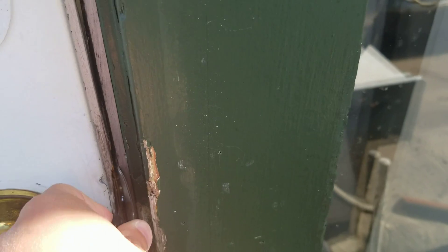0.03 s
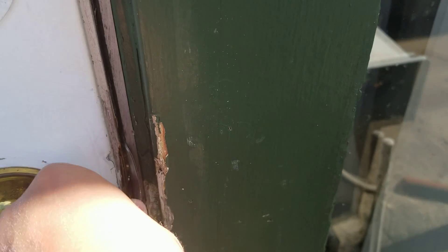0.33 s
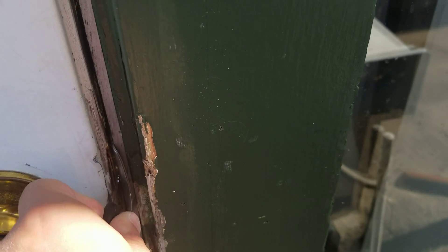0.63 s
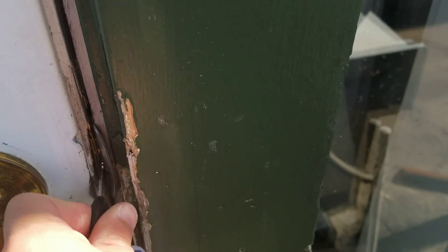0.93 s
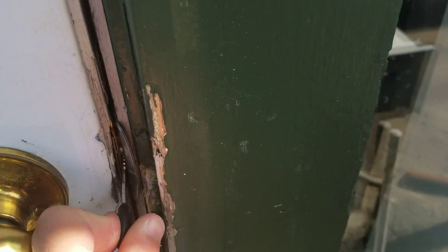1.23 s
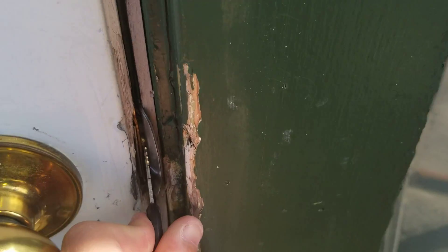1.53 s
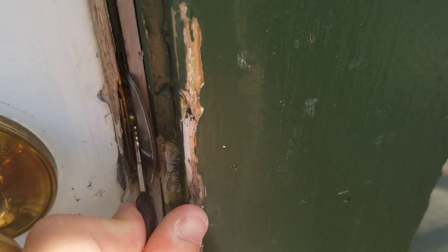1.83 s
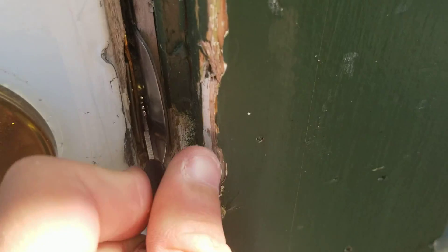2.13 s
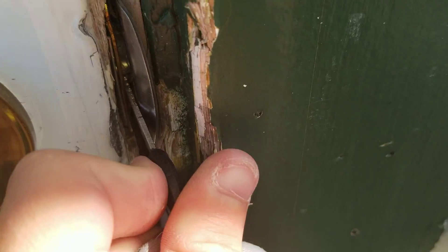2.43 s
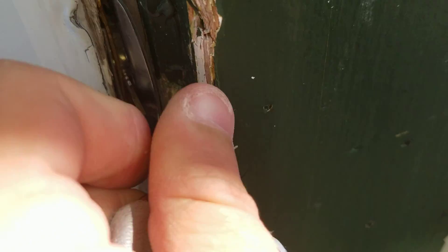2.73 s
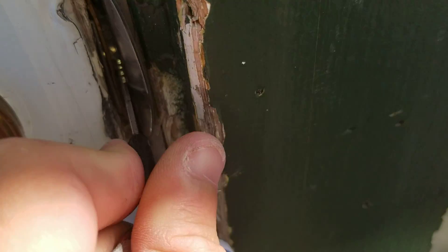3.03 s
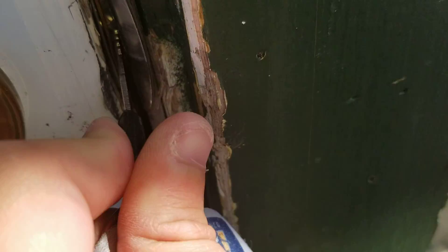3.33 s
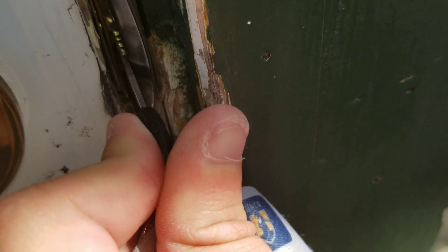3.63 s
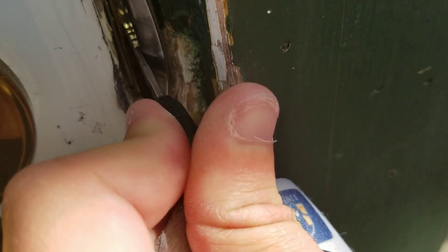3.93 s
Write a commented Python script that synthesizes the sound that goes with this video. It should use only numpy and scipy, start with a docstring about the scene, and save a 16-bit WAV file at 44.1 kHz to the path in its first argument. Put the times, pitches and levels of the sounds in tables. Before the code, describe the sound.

Wood splinters snap close by as fingers pry at a door edge, with small ticks throughout. A light snap comes at 0.7 seconds, loud ones at 1.2, 2.3 and 2.9, and a lighter one at 4. The door thuds at 1.2 and 2.1, and knocks hollowly at 3.5. Skin rubs softly from 1 to 2 seconds. Distant traffic rumbles low, with three very faint birdlike whistles in the second half.

```python
"""Wood fibres tick and snap as fingers pry at the splintered edge of a door in an outdoor doorway.
Each fracture is an impulse that excites damped modes of the wood; the doorway adds a short echo.
The door thuds twice on its latch, its edge gives one hollow tock, and skin rubs softly over the paint.
Behind lies a low outdoor rumble of distant traffic, with brief bumps from wind or handling and the
door's thump. A thin whine and three faint, birdlike whistles come from far away."""
import sys
import numpy as np
from scipy import signal
from scipy.fft import rfft, irfft, next_fast_len
from scipy.io import wavfile
from scipy.ndimage import uniform_filter1d

SR = 44100
rng = np.random.default_rng(int(sys.argv[2]) if len(sys.argv) > 2 else 0)


def pcm_store(signal):
    """Save signal as 16-bit PCM."""
    levels = np.round(np.clip(np.atleast_2d(signal), -1, 1) * 32767)
    wavfile.write(sys.argv[1], SR, levels.astype(np.int16).T)


N = 176400

# Splinters snapping off; levels in all tables are relative. Columns: start_s, level_db,
# five band gains (body_db, knock_db, bite_db, crack_db, fizz_db),
# the splinter's two modes (lower_hz, lower_db, upper_hz, upper_db)
SNAPS = [(0.7039, -10.5, -11, 4.5, 1, -21, -34, 1780, -4, 3150, -15.5),
         (1.1806, 2.5, -17, 0, 4.5, 0, -9.5, 3620, -4.5, 4050, -7),
         (2.0976, -17.5, 10, 2, 4, -4, -10, 2730, 2.5, 5700, -3),
         (2.3344, 7, -33, -7, 4.5, -1.5, -4, 3760, -1.5, 5920, -10),
         (2.8948, 1.5, -12, 7.5, 7.5, 0, -3, 4300, -7, 5680, -0.5),
         (3.9977, -12, 3, 4, -4, -2, -6, 3780, -5, 4270, -8)]
# Bands of a snap (body, knock twice, 0 dB reference, bite, crack, fizz): frequency_hz
SNAP_BANDS_HZ = [400, 700, 1250, 1900, 3100, 5500, 13000]
# Modes of the door edge: pitch_hz, level_db, t60_s
EDGE_MODES = [(662, -15.5, 0.042), (926, -12.5, 0.038), (1108, -14.5, 0.018), (1314, -16.5, 0.064),
              (1810, -20, 0.075), (2262, -14, 0.032), (2902, -16, 0.015), (3390, -20, 0.014),
              (4440, -21, 0.0093), (5410, -12, 0.012), (6020, -12.5, .008), (6820, -27, .01),
              (11000, -12.5, 0.0095), (13800, -22, 0.0035)]
EDGE_DB, FRACTURE_DB, CRUMBLE_DB, SPLINTER_ECHO_DB = -2.5, -20.5, -1, -12
CRUMBLE_T60_S, SPLINTER_T60_S, HIT_S = 0.012, 0.011, 0.3
# Fibres failing under strain: time_s, level_db, treble_db
TICKS = [(0.096, -45, -7), (.2563, -46.5, 2), (0.2807, -42, -1.5), (0.968, -35, -11.5), (.9911, -44.5, 9),
         (1.05, -40, -2), (1.513, -39.5, -2), (1.6314, -49.5, 9.5), (1.7283, -42, -7), (1.8284, -44.5, 1.5),
         (2.0817, -50, 0), (2.172, -44, -4), (2.2076, -45, -2), (2.2234, -37.5, -3), (2.2398, -40, -0.5),
         (2.4137, -52, 12), (2.5077, -46, 13.5), (2.818, -46, -2), (3.1502, -42.5, -8), (3.2124, -47.5, 3),
         (3.242, -46.5, -2), (3.2904, -41, 1), (3.5084, -42.5, 0), (3.555, -49, 8), (3.6526, -44.5, 0),
         (3.6915, -45, 2.5), (3.74, -58, 14), (3.914, -38.5, 2), (3.9852, -48, 5)]
# Spectrum of a tick: frequency_hz, gain_db
TICK_SPECTRUM = [(300, 3), (1200, 14.5), (2200, 12.5), (3100, 3), (4500, 9.5), (6500, 6), (9000, -4),
                 (14000, -7)]
TICK_DB, TICK_BASE_T60_S, TICK_DELAY_S, TICK_STRETCH_PER_DB = 15, 0.012, 0.001, 0.11
# Impacts of the door on its latch: start_s, level_db
THUDS = [(1.192, -9), (2.0972, -12)]
# Modes of the whole door: pitch_hz, level_db, t60_s
PANEL_MODES = [(122.3, 0.5, 0.45), (206, 2.5, 0.17), (260, -13.5, .1), (358, -6, 0.054)]
TOCK_S, TOCK_HZ, TOCK_DB, TOCK_RISE_S, TOCK_ECHO_DB = 3.527, 1634, -23.5, 0.0016, -5
# Strokes of skin on paint: start_s, end_s, level_db, resonance_db
RUBS = [(0.898, 1.1, -56.5, 17), (1.178, 1.937, -57.5, 13.5), (3.243, 3.656, -58, -1)]
# Spectrum of the friction: frequency_hz, gain_db
RUB_SPECTRUM = [(600, -17), (1800, 9), (3000, 0.5), (7000, 4.5), (9000, 3.5), (12000, -5), (16000, -5)]
RUB_FADE_S, RUB_RESONANCE_HZ, SCRAPE_WIDTH_HZ = 0.11, 1740, 720
# Rising resonance in the longest rub: time_s, pitch_hz, level_db
SCRAPE_GLIDE = [(1.199, 2250, -72), (1.3, 2454, -59), (1.62, 2824, -59.5), (1.85, 3350, -64)]

# Spectra of low outdoor rumble, tyre noise and hiss: frequency_hz, gain_db
RUMBLE_SPECTRUM = [(20, -26.5), (32, -20), (45, -5.5), (60, 3.5), (80, -5.5), (120, -1.5), (160, -12),
                   (205, -13), (260, -18.5), (330, -19.5), (500, -30.5), (900, -37.5), (3000, -65.5)]
TYRE_SPECTRUM = [(200, -11), (560, -7), (900, 3), (1300, -4.5), (1850, -2.5), (2500, -11.5), (3300, -32),
                 (8000, -37.5)]
AIR_SPECTRUM = [(500, -11), (3000, 1), (4300, 2.5), (5600, -3), (7300, -0.5), (9000, -13), (12000, -9.5),
                (16000, -11.5)]
# Rumble of distant traffic, with bumps from wind or handling and the door's thump: time_s, level_db
RUMBLE_ENVELOPE = [(0.0, -34.5), (0.03, -37.5), (0.85, -36.5), (1.02, -39), (1.11, -33), (1.16, -40.5),
                   (1.21, -31), (1.27, -37.5), (2.54, -37), (2.56, -34.5), (2.65, -38.5), (2.78, -36),
                   (3.25, -37.5), (3.43, -34.5), (3.5, -41), (3.64, -35), (3.94, -39), (4.0, -33)]
# Receding tyre noise: time_s, level_db
TYRE_ENVELOPE = [(0.0, -48.5), (0.76, -51.5), (1.16, -50.5), (1.76, -54), (3.27, -55.5), (3.51, -55),
                 (3.98, -55)]
RUMBLE_DB, TYRE_DB, AIR_DB = 0.5, 1.5, -61
# Bands of a distant whine: pitch_hz, half_width_hz, level_db
WHINES = [(917, 20, -71), (1052.4, 13.5, -63)]
# Far whistles: start_s, length_s, pitch_hz, rise_hz, level_db
WHISTLES = [(2.255, .045, 3520, 160, -61), (2.825, .085, 4450, 242, -62), (3.782, 0.094, 6350, -85, -64)]

# Spectrum of the doorway's reverberant tail: frequency_hz, gain_db
TAIL_SPECTRUM = [(150, -1), (900, 5), (3500, 0), (7000, -3), (12000, -5), (15000, -6)]
EARLY_DB, EARLY_T60_S, TAIL_DB, TAIL_T60_S, WALL_DELAY_S = -8, 0.045, -10, 0.13, 0.0022
# Side signal against mid in a diffuse field: frequency_hz, gain_db
SIDE_SPECTRUM = [(60, -22), (120, -16.5), (200, -10), (380, -7.5), (700, -3), (1300, 3.5), (2400, -2),
                 (5000, 0.5)]
# Treble response of the microphone: frequency_hz, gain_db
MIC_RESPONSE = [(7200, -1), (8300, -5), (9200, -8), (10200, -4), (11200, 0.5), (13500, 0.5), (16000, -1.5)]
RIGHT_LAG_S, RIGHT_DB, MAX_LAG_RAD = 0.00017, -0.3, 1.35
CEILING, CUTOFF_HZ = 1.1, 15900


def snaps():
    """Brittle fracture: a pulse and crumbling noise sound with the modes of the edge and the splinter."""
    out = np.zeros((2, N))
    edge = undb(EDGE_DB) * modal_sum(EDGE_MODES)
    edge[0] += undb(FRACTURE_DB)
    for start, db, body, knock, bite, crack, fizz, lower_hz, lower_db, upper_hz, upper_db in SNAPS:
        fracture = ports(edge) + undb(CRUMBLE_DB) * burst(CRUMBLE_T60_S)
        fracture = colour(fracture, list(zip(SNAP_BANDS_HZ, [body, knock, knock, 0, bite, crack, fizz])))
        splinter = modal_sum([(lower_hz, lower_db, SPLINTER_T60_S), (upper_hz, upper_db, SPLINTER_T60_S)])
        add(out, start, undb(db) * (doorway(fracture) + doorway(ports(splinter), SPLINTER_ECHO_DB)))
    return out


def ticks():
    """Acoustic emission: each failing fibre releases a burst of noise; duller ones last longer."""
    out = np.zeros((2, N))
    for time, db, treble_db in TICKS:
        t60 = TICK_BASE_T60_S * np.exp(-TICK_STRETCH_PER_DB * treble_db)
        click = colour(burst(t60), TICK_SPECTRUM)
        click = colour(click, [(2500, 0.011), (11000, treble_db)])
        add(out, time + TICK_DELAY_S, undb(db + TICK_DB) * doorway(click))
    return out


def thuds():
    """Free vibration: the door springs back on its latch and booms in its low modes."""
    out = np.zeros((2, N))
    panel = ports(modal_sum(PANEL_MODES))
    for start, db in THUDS:
        add(out, start, undb(db) * panel)
    return out


def tock():
    """Resonance: a soft contact in the edge swells one mode; the hand screens it, weakening the echo."""
    out = np.zeros((2, N))
    t = np.arange(int(HIT_S * SR)) / SR
    swell = (t / TOCK_RISE_S * np.exp(1 - t / TOCK_RISE_S)) ** 2
    tone = swell * np.sin(2 * np.pi * TOCK_HZ * t)
    add(out, TOCK_S, undb(TOCK_DB) * doorway(ports(tone), TOCK_ECHO_DB))
    return out


def rubbing(t):
    """Sliding friction: skin on paint makes an uneven hiss, shaped by one resonance."""
    flicker_db = 0.71 * wander(36) + 1.9 * wander(400)
    hiss = undb(flicker_db) * diffuse(RUB_SPECTRUM)
    out = np.zeros((2, N))
    for start, end, db, resonance_db in RUBS:
        envelope = np.clip(np.minimum(t - start, end - t) / RUB_FADE_S, 0, 1)
        out += undb(db) * envelope * colour(hiss, [(1200, 0), (RUB_RESONANCE_HZ, resonance_db), (2400, 0)])
    return out


def scrape(t):
    """Narrow-band friction noise: a randomly modulated carrier climbs as the hand slides."""
    times, hz, db = np.array(SCRAPE_GLIDE).T
    grain = np.array([wander(SCRAPE_WIDTH_HZ) + 1j * wander(SCRAPE_WIDTH_HZ) for _ in range(2)])
    phase = 2 * np.pi * np.cumsum(np.interp(t, times, hz)) / SR
    envelope = np.interp(t, times, undb(db), left=0, right=0)
    return envelope * np.real(grain * np.exp(1j * phase))


def outdoors(t):
    """Incoherent superposition: low rumble with brief bumps, receding tyre noise, a whine and hiss."""
    rumble_db = RUMBLE_DB + np.interp(t, *np.array(RUMBLE_ENVELOPE).T)
    rumble = undb(rumble_db) * diffuse(RUMBLE_SPECTRUM)
    tyre_db = TYRE_DB + np.interp(t, *np.array(TYRE_ENVELOPE).T) + 1.8 * wander(9)
    tyres = undb(tyre_db) * diffuse(TYRE_SPECTRUM)
    whine = np.zeros((2, N))
    for hz, width, db in WHINES:
        band = [(hz - 8 * width, -60), (hz - width, -12), (hz, 0), (hz + width, -12), (hz + 8 * width, -60)]
        whine += undb(db) * diffuse(band)
    return rumble + tyres + whine + undb(AIR_DB) * diffuse(AIR_SPECTRUM)


def whistles():
    """Frequency modulation: short, far tones glide and waver like a bird's call."""
    out = np.zeros((2, N))
    for start, length, hz, rise_hz, db in WHISTLES:
        progress = np.linspace(0, 1, int(length * SR))
        pitch_hz = hz + rise_hz * progress + 40 * wander(280)[:len(progress)]
        note = np.sin(np.pi * progress) * np.sin(2 * np.pi * np.cumsum(pitch_hz) / SR)
        add(out, start, undb(db) * ports(note))
    return out


def doorway(x, echo_db=0):
    """Reverberation: convolution adds early reflections and a short tail to the direct sound."""
    early = undb(EARLY_DB) * burst(EARLY_T60_S)
    tail = undb(TAIL_DB) * colour(burst(TAIL_T60_S), TAIL_SPECTRUM)
    response = np.pad(early + tail, ((0, 0), (int(WALL_DELAY_S * SR), 0)))
    return x + undb(echo_db) * signal.fftconvolve(x, response, axes=1)[:, :x.shape[1]]


def ports(x):
    """Path difference: the right microphone port lags; the phase shift levels off in the treble."""
    n = 2 * len(x)
    hz = np.arange(len(x) + 1) * SR / n
    lag_rad = np.minimum(2 * np.pi * hz * RIGHT_LAG_S, MAX_LAG_RAD)
    right = irfft(rfft(x, n) * np.exp(-1j * lag_rad))[:len(x)]
    return np.array([x, undb(RIGHT_DB) * right])


def diffuse(spectrum):
    """Diffuse field: stereo noise of unit rms, coherent between the channels at long wavelengths."""
    mid, side = rng.standard_normal((2, N))
    side = colour(side, SIDE_SPECTRUM)
    noise = colour(np.array([mid + side, mid - side]), spectrum)
    return noise / noise.std()


def modal_sum(modes):
    """Modal superposition: one damped sinusoid for each (pitch_hz, level_db, t60_s)."""
    t = np.arange(int(HIT_S * SR)) / SR
    return sum(undb(db) * unit_energy(decay(t60) * np.sin(2 * np.pi * hz * t)) for hz, db, t60 in modes)


def burst(t60):
    """Damped noise, uncorrelated between the channels."""
    envelope = decay(t60)
    return unit_energy(rng.standard_normal((2, len(envelope))) * envelope)


def decay(t60):
    """Exponential damping: a fall of 60 dB every t60 seconds."""
    return np.exp(-np.log(1000) * np.arange(int(HIT_S * SR)) / SR / t60)


def wander(rate_hz):
    """Random modulation: linear ramps between Gaussian values."""
    step = int(SR / rate_hz)
    return uniform_filter1d(np.repeat(rng.standard_normal(N // step + 1), step), step)[:N]


def colour(x, spectrum):
    """Minimum-phase filter through (frequency_hz, gain_db) points."""
    n = 2 * next_fast_len(x.shape[-1])
    hz, db = np.array(spectrum, float).T
    bin_hz = np.arange(n // 2 + 1) * SR / n
    gain = undb(np.interp(np.log(bin_hz + 1), np.log(hz), db))
    cepstrum = irfft(np.log(gain))
    cepstrum[1:n // 2] *= 2  # folding onto positive time makes the filter causal
    cepstrum[n // 2 + 1:] = 0
    return irfft(rfft(x, n) * np.exp(rfft(cepstrum)))[..., :x.shape[-1]]


def unit_energy(x):
    """Normalise the energy of each channel."""
    return x / np.sqrt(np.sum(x ** 2, axis=-1, keepdims=True))


def undb(db):
    """Decibels to amplitude ratio."""
    return 10 ** (np.asarray(db) / 20)


def add(out, start_s, x):
    """Superpose x on out from start_s."""
    i = min(int(start_s * SR), N - 1)
    out[:, i:i + x.shape[1]] += x[:, :N - i]


def scene():
    """Linear superposition of the near door and the outdoor background."""
    t = np.arange(N) / SR
    return snaps() + thuds() + ticks() + tock() + rubbing(t) + scrape(t) + outdoors(t) + whistles()


def record(dry):
    """Transduction: the microphone dips in the treble, saturation rounds peaks, a low-pass cuts the top."""
    saturated = CEILING * np.tanh(colour(dry, MIC_RESPONSE) / CEILING)
    low_pass = signal.ellip(10, 0.2, 80, CUTOFF_HZ, fs=SR, output="sos")
    return signal.sosfilt(low_pass, saturated)


dry = scene()
out = record(dry)
pcm_store(out)
```